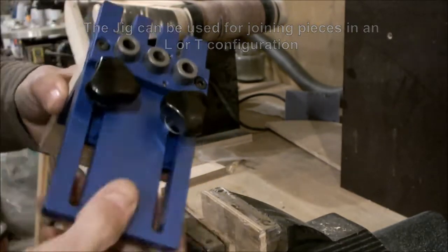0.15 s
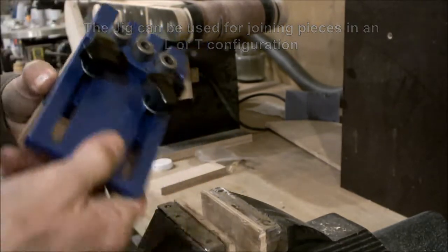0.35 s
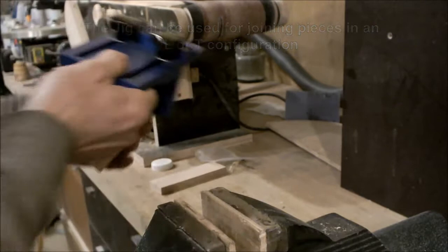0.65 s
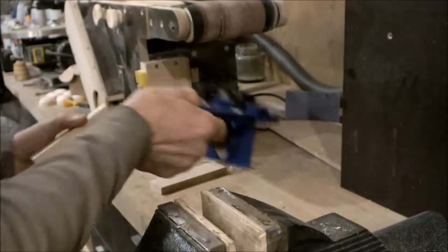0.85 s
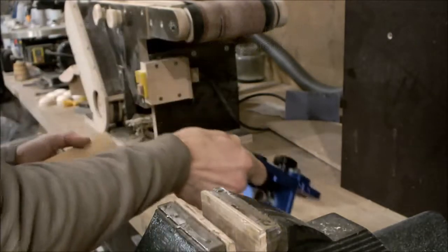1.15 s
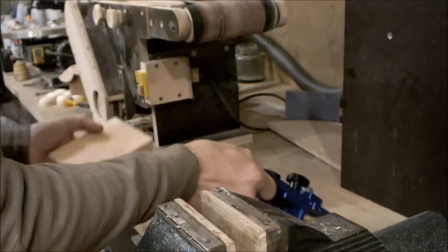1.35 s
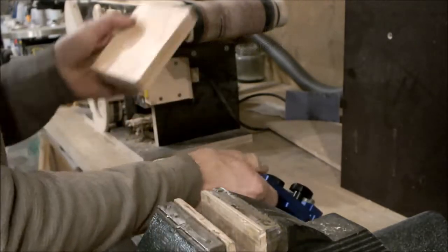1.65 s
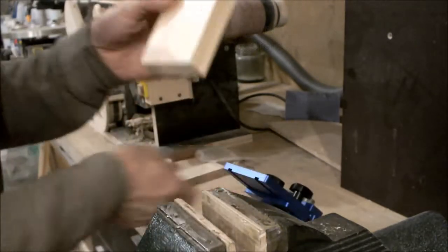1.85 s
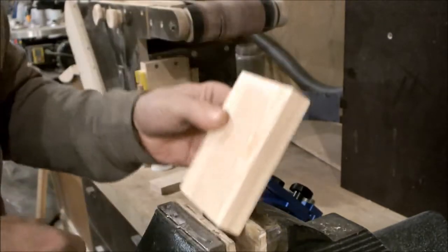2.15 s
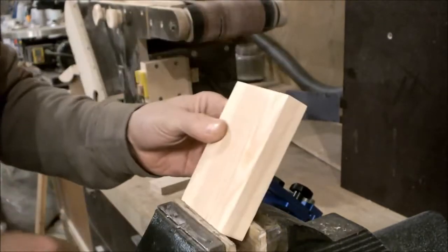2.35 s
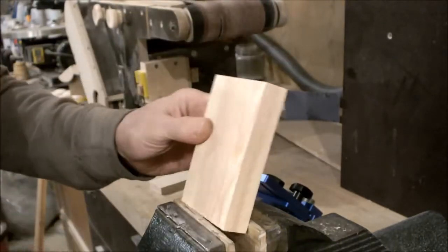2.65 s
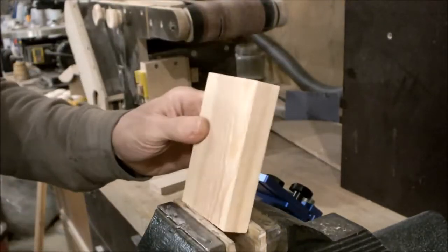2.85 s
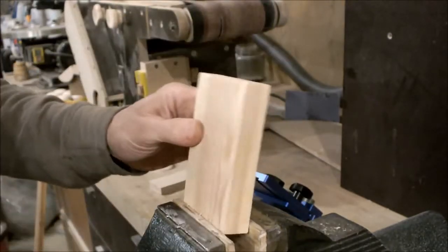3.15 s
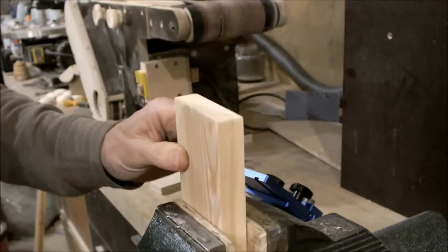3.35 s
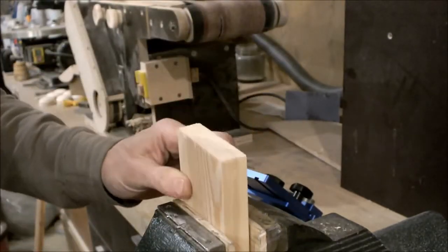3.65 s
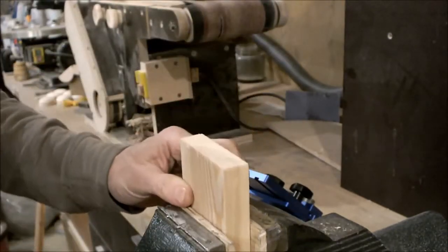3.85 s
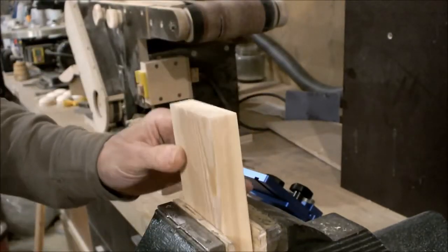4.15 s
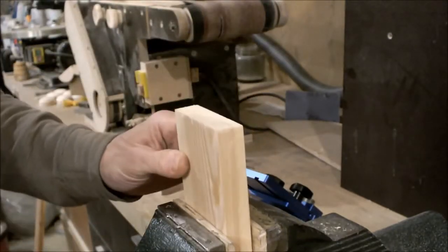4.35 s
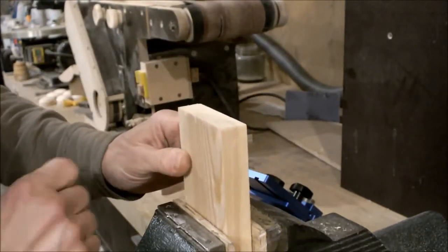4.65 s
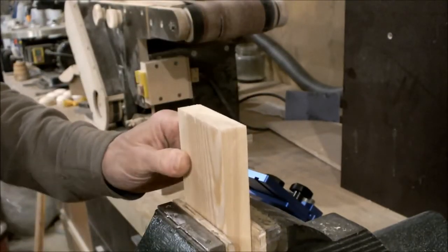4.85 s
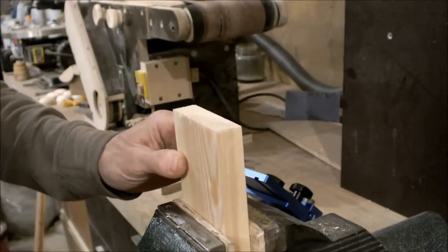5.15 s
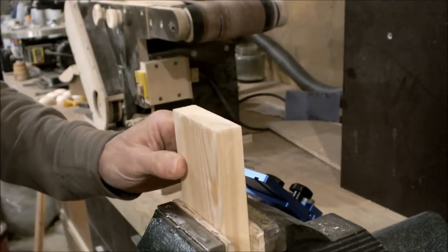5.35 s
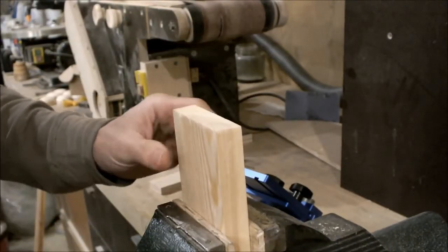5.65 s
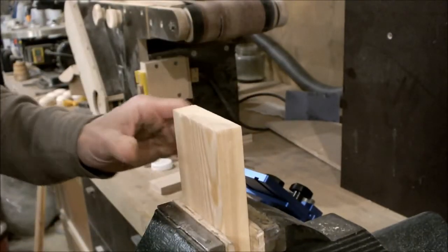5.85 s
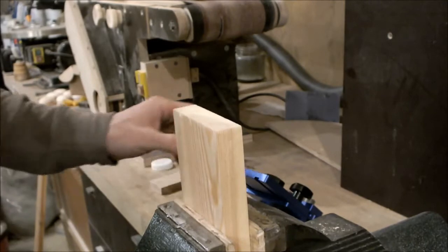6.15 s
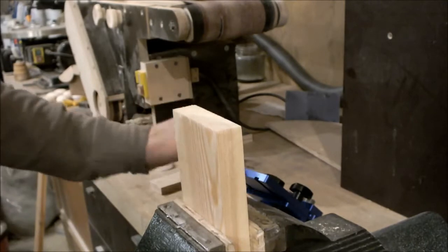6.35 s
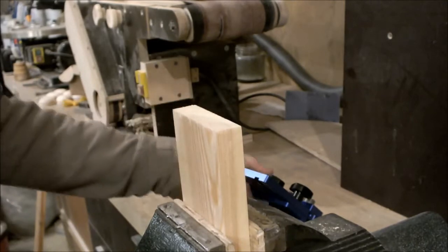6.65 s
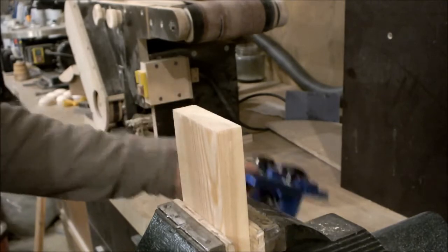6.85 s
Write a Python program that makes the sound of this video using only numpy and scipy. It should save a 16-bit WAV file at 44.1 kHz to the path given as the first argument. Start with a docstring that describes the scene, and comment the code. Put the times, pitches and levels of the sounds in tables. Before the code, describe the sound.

A metal jig clatters onto a wooden bench, a wood block knocks and scrapes into a vise, then the vise handle clacks and rings.

```python
"""Clamping pine in a vise

A metal jig rocks to rest on a wooden workbench. A pine block knocks against a vise and scrapes down
between the jaws, juddering and squeaking as it sticks and slips. The vise is tightened: its sliding
handle clacks on the screw head and rings. The work sits a little to the right. Sleeves rustle, and
a small workshop answers the blows over a faint steady hiss."""
import sys
import numpy as np
from scipy import signal
from scipy.fft import rfft, irfft, next_fast_len
from scipy.io import wavfile

SR = 44100
rng = np.random.default_rng(int(sys.argv[2]) if len(sys.argv) > 2 else 0)


def wrap_up_sound(samples):
    """Save the sound to the file named by the first command line argument, as 16-bit audio."""
    columns = np.atleast_2d(samples).T
    # keep every value between -1 and 1, then stretch to whole-number steps
    tamed = np.clip(columns, -1, 1)
    steps = np.round(tamed * 32767).astype(np.int16)
    wavfile.write(sys.argv[1], SR, steps)


N = 308700
T = np.arange(SR // 2) / SR  # time axis of one blow or stroke

# handle hits screw head; the faint last row is a hand brushing the handle: start_s, body_db, click_db, ping_hz,
# ping_re_click_db, struck_hz, struck_db
HANDLE_CLACKS = [(4.9647, -26.5, -20.5, 2600, 3, 4380, -30.5), (5.079, -39.5, -38, 1470, 2, 1554, -41),
                 (5.2793, -36.5, -35, 1780, -1, 1695, -46), (5.313, -25, -20, 2480, 6.5, 2360, -29),
                 (5.493, -38.5, -39.5, 1500, -6, 1166, -44), (6.103, -17.5, -17.5, 3150, -4, 1575, -38),
                 (6.3083, -23.5, -19.5, 1825, 0.5, 7170, -30.5), (6.317, -30, -21, 1650, 8, 1204, -26),
                 (6.358, -32.5, -31, 2240, 9, 2810, -38.5), (6.364, -32, -28, 1160, 19, 1700, -27.5),
                 (6.774, -37.5, -58, 1580, -9, 1576, -41)]
# jolts pass through the vise into the bench frame: start_s, level_db
FRAME_JOLTS = [(3.576, -48), (4.967, -46), (6.105, -36)]
# the jig lands on the bench: start_s, level_db, hardness_hz
JIG_KNOCKS = [(1.417, -41, 169), (1.447, -51.5, 170), (1.54, -29, 520), (1.5714, -15, 2060),
              (1.587, -21.5, 900), (1.622, -37, 1300), (1.661, -22, 706)]
# the block bumps the jaws: start_s, level_db, hardness_hz
PINE_KNOCKS = [(2.201, -34, 1110), (2.213, -30, 5920), (2.572, -43, 1600), (2.64, -54.5, 900),
               (3.0585, -32.5, 1990), (3.177, -42, 1320), (3.201, -39.5, 1100), (3.272, -38, 4500),
               (3.306, -29, 1370), (3.8445, -39.5, 3040), (4.166, -40, 1820), (4.349, -50, 550),
               (4.725, -49, 617)]
# the block is pushed down, scrapes louder and catches: catch_s, level_db, rise_s
PINE_PUSHES = [(2.635, -44, 0.042), (3.302, -32.5, 0.024), (3.563, -32.5, 0.035), (3.718, -37, 0.026)]
# it slides lightly along the jaws: peak_s, level_db, rise_s
PINE_SLIDES = [(2.5, -46.5, 0.12), (3.256, -34, 0.0096), (4.0, -39.5, 0.049)]
# a sharp edge ticks on the metal: peak_s, level_db
EDGE_TICKS = [(3.058, -32.5), (3.167, -38.5), (3.4663, -32.5), (6.86, -43.5)]
# stick-slip runs: start_s, level_db, length_s, hardness_hz
PINE_JUDDERS = [(2.219, -32, .02, 2770), (3.269, -30, 0.0052, 2220), (3.294, -29.5, 0.014, 3030),
                (3.548, -33, 0.033, 2600), (3.703, -34, 0.015, 2800), (4.001, -39.5, 0.052, 1690),
                (4.168, -41, 0.017, 1920), (4.205, -44.5, 0.042, 1300)]
# squeaks on a jaw: peak_s, level_db, pitch_hz, half_length_s
PINE_SQUEAKS = [(3.566, -32, 2500, 0.0041), (3.565, -32, 3290, 0.0033)]
# sleeves and hands brush past: peak_s, level_db, rise_s
SLEEVE_STROKES = [(.23, -53.5, 0.096), (.46, -53.5, 0.021), (1.3, -50, 0.035), (1.675, -51, 0.094),
                  (1.86, -52.5, 0.045), (2.06, -48, 0.036)]

# how each body rings: pitch_hz, level_db, t60_s
HANDLE_MODES = [(406.5, -4, 0.15), (1198, -6, 0.15), (1480, -3, 0.3), (1575, -4, 0.41), (1670, -1, 0.25),
                (1800, -7, 0.22), (2330, -10, 0.17), (2594, -5.5, 0.24), (2780, -4.5, 0.098),
                (3310, -8.5, 0.13), (3690, -3, 0.14)]
FRAME_MODES = [(112, -1, 0.18), (144, -0.5, 0.25), (192.7, -2, 0.33)]
BENCH_MODES = [(166, 0.5, 0.09), (295, -8, 0.58), (334, 4.5, 0.18), (395, 9, 0.12), (458.5, 0, 0.2),
               (524, -1, 0.23), (618, 2.5, 0.21), (652, -0.5, 0.23), (721, 6, 0.17), (844, 2, 0.12),
               (1120, 3, 0.093), (1717, -15, 0.48)]
PINE_MODES = [(347, -8, 0.6), (476, 7.5, 0.089), (838, 6, 0.23), (1008, 13.5, 0.065), (1403, 13, 0.061),
              (1526, 15, 0.043), (1829, 15.5, 0.041), (2624, 20, 0.026)]
JAW_MODES = [(1350, 1.5, 0.05), (1484, 8.5, 0.076), (1640, 7, 0.053), (2440, -0.5, 0.014)]

# tone colour of each layer: frequency_hz, gain_db
VISE_EQ = [(40, -20), (130, -6), (220, -7), (420, 4), (620, -5.5), (900, 4.5), (1600, -2), (2000, -1.5),
           (2800, -2.5), (5000, -7.5), (8000, -6), (15000, -7)]
CLICK_EQ = [(200, -26), (800, -8.5), (1800, 0), (4000, -5.5), (8500, -10), (15000, -13)]
BENCH_EQ = [(40, -56), (90, -20), (150, -9.5), (225, -12), (330, 0.5), (650, 0.5), (1000, -8.5),
            (1400, -14), (2500, -18), (6000, -38), (15000, -38)]
PINE_EQ = [(50, -22), (200, -5.5), (320, 9.5), (900, 4), (1500, 11.5), (2000, 6.5), (3000, 2.5),
           (5000, -4.5), (15000, 2)]
SCRAPE_EQ = [(110, -24.5), (350, -7), (800, -5), (1450, -5.5), (2000, 1.5), (3000, 8), (4500, 2),
             (8000, -4.5), (15000, -9)]
CLOTH_EQ = [(150, -5), (600, -13), (1500, 7.5), (3000, 4), (4800, 9), (8000, 2.5), (15000, 5)]
HISS_EQ = [(15, -60), (25, -13), (119, -6.5), (331, -1.5), (598, -4), (684, -1), (997, -7.5), (2300, -9),
           (4400, -13), (6920, -17.5), (15500, -28.5)]

# the workshop's decay: frequency_hz, t60_s
ROOM_DECAY = [(120, 0.5), (400, 0.36), (14000, 0.32)]
# stereo width of the action and of the hiss: frequency_hz, side_minus_mid_db
ACTION_WIDTH = [(100, -47), (350, -20), (700, -12), (1500, -2), (4000, -3), (10000, 0)]
HISS_WIDTH = [(60, -1.5), (300, -3), (700, -4), (1500, -1), (5000, 0)]
# where the work sits between left and right: frequency_hz, left_minus_right_db
BENCH_PAN = [(300, -3), (950, -2.5), (1700, -6), (3700, -5), (13000, 1.8)]

FIRM_DB, FIRM_HZ, HARDNESS_DB_PER_OCTAVE = -24, 3460, 12.8  # a firm clack; stronger is brighter
SHAKE_HZ, SHAKE_DB_PER_OCTAVE = 125, 41  # low cut of a firm clack; stronger reaches deeper
RATTLE_RATE_HZ, RATTLE_AT_HZ = 96, 4000  # speed of the rattle; pitch that wavers by one radian
ROCK_S, ROCK_SHRINK, ROCK_FIRST_DB, ROCK_NEXT_DB = .028, 0.65, -19.5, -0.5  # the jig's rebounds
ENTER_S, SEATED_S = 2.3, 3.88  # the block enters the jaws; it sits fully between them
GRIP_SHIFT = .025  # share by which hand and jaws retune the block from contact to contact
PUSH_STOP_S, PUSH_BRIGHT_HZ = 0.0072, 11400
TICK_RISE_S, TICK_FALL_S, TICK_BRIGHT_HZ = 0.0029, 0.0055, 14000
TOP_HZ = 15900


def vise_clacks(ping_t60=0.019, struck_t60=0.2, swell_s=0.0033, rise_cycles=2.13, steel_db=-4):
    """Steel hits steel: a bright click, a dead ping, a roomy body and the loose handle's ring."""
    out = np.zeros((2, N))
    for s, body_db, click_db, ping_hz, ping_db, struck_hz, struck_db in HANDLE_CLACKS:
        hard_hz = hardness(body_db)
        low_hz = SHAKE_HZ * 2 ** ((FIRM_DB - body_db) / SHAKE_DB_PER_OCTAVE)
        push = contact(t60=0.036, push_db=-31, rise_s=rise_cycles / hard_hz)
        ping = ring([(ping_hz, 0, ping_t60)]) * (1 - np.exp(-T * ping_hz))  # builds over one cycle
        snap = soften(colour(push, CLICK_EQ), 1.76 * hardness(click_db), order=3)
        click = blow(unit(snap) + undb(ping_db) * ping, click_db)
        shake = colour(through(push, workshop()), VISE_EQ)
        body = blow(radiate(soften(shake, hard_hz), low_hz), body_db)
        steel = blow(soften(ring(HANDLE_MODES, rattle=1.0), 3.4 * hard_hz), body_db + steel_db)
        struck = blow(ring([(struck_hz, 0, struck_t60)], rattle=1.0), struck_db)  # the mode hit hardest
        swell = 1 - np.exp(-T / swell_s)  # the ring spreads through the heavy casting
        add(out, s, click + body + (steel + struck) * swell)
    return out


def hardness(db):
    """A stronger blow flattens the contact faster, so its treble cutoff in Hz is higher."""
    return FIRM_HZ * 2 ** ((db - FIRM_DB) / HARDNESS_DB_PER_OCTAVE)


def frame_thumps(rise_s=0.018):
    """The heavy bench frame takes up a jolt slowly and hums briefly."""
    out = np.zeros((2, N))
    for s, db in FRAME_JOLTS:
        add(out, s, blow(ring(FRAME_MODES) * (1 - np.exp(-T / rise_s)), db))
    return out


def wood_knocks(rows, eq, modes, contact_t60, push_db, ring_db, room_db, low_hz, grip=0):
    """Blows on wood: a broad thud, damped modes and the room's answer."""
    out = np.zeros((2, N))
    for s, db, hard_hz in rows:
        thud = unit(colour(contact(contact_t60, push_db, rise_s=0.00044), eq))
        attack = 1 - np.exp(-T * hard_hz / 1.24)  # a soft knock swells more slowly
        wood = (thud + undb(ring_db) * ring(retuned(modes, grip))) * attack
        near = blow(radiate(soften(wood, hard_hz, order=3), low_hz), db)
        add(out, s, near + blow(through(near, workshop()), db + room_db))
    return out


def jig_rocking(rebounds=3):
    """The jig rocks on its edges after each knock, every rebound sooner and weaker."""
    for s, db, hard_hz in JIG_KNOCKS:
        yield s, db, hard_hz
        for k in range(rebounds):
            s += ROCK_S * ROCK_SHRINK ** k
            yield s, db + ROCK_FIRST_DB + k * ROCK_NEXT_DB, hard_hz


def scrapes(jaws_db=-0.5, hollow_db=-12, room_db=-7):
    """Rubbing rings the hollow-sounding block, and the jaws too as it sinks between them."""
    pushes = [(s, db, rise, PUSH_STOP_S, PUSH_BRIGHT_HZ) for s, db, rise in PINE_PUSHES]
    ticks = [(s, db, TICK_RISE_S, TICK_FALL_S, TICK_BRIGHT_HZ) for s, db in EDGE_TICKS]
    slides = swells(PINE_SLIDES, fall_share=0.58, bright_hz=11900)
    rub = rubbing(pushes + ticks + slides, SCRAPE_EQ, grain_db=3.0, rasp_db=2.0)
    jaws = through(rub * seated(np.arange(N) / SR), ring(JAW_MODES))
    hollow = through(rub, ring(PINE_MODES))
    wood = rub + undb(jaws_db) * jaws + undb(hollow_db) * hollow
    return wood + undb(room_db) * through(wood, workshop())


def rubbing(strokes, eq, grain_db, rasp_db=0, rasp_hz=140):
    """Fibres catch and slip in uneven grains that can bunch into a rasp; each stroke swells and fades."""
    out = np.zeros((2, N))
    from_peak = T - T.mean()
    for s, db, rise, fall, bright_hz in strokes:
        grains = np.repeat(undb(grain_db * rng.standard_normal(len(T))), 24)[:len(T)]  # 24 samples each
        grains = grains * undb(rasp_db * waver(rasp_hz))
        friction = colour(noise(len(T), ACTION_WIDTH) * grains, eq)
        rub = unit(soften(friction, bright_hz)) * np.sqrt(len(T))
        envelope = np.exp(np.minimum(from_peak / rise, -from_peak / fall))
        add(out, s - T.mean(), rub * undb(db) * envelope)
    return radiate(out, 79)


def swells(rows, fall_share, bright_hz):
    """Free rubbing strokes, each fading in proportion to its rise."""
    return [(s, db, rise, fall_share * rise, bright_hz) for s, db, rise in rows]


def seated(s):
    """How deep the block sits between the jaws, from 0 to 1."""
    return np.interp(s, (ENTER_S, SEATED_S), [0, 1])


def judders(slip_hz=760, uneven=0.355, spread_db=2, low_hz=200, ring_db=-2, jaws_db=-5.5, room_db=-5):
    """The block sticks and slips in a quick uneven run that swells, dies away and rings hollow."""
    out = np.zeros((2, N))
    for s, db, length, hard_hz in PINE_JUDDERS:
        gaps, sizes = rng.standard_normal((120, 2)).T  # 120 slips a run
        slip_s = np.cumsum(np.exp(uneven * gaps)) / slip_hz
        slips = np.bincount((slip_s * SR).astype(int), undb(spread_db * sizes), len(T))[:len(T)]
        envelope = np.sqrt(T) * np.exp(-(T / length) ** 2)
        tap = unit(colour(contact(t60=0.0069, push_db=-39, rise_s=0.00083), PINE_EQ))
        wood = tap + undb(ring_db) * ring(retuned(PINE_MODES, GRIP_SHIFT))
        run = unit(through((slips * envelope)[None], wood))
        jaws = undb(jaws_db) * seated(s) * unit(through(run, ring(JAW_MODES)))
        near = blow(radiate(soften(run + jaws, hard_hz, order=3), low_hz), db)
        add(out, s, near + blow(through(near, workshop()), db + room_db))
    return out


def squeaks(wobble=0.018, wobble_hz=250, room_db=-9):
    """Dry wood sings for an instant on the jaw, its pitch unsteady."""
    out = np.zeros((2, N))
    for s, db, hz, half_s in PINE_SQUEAKS:
        pitch_hz = hz * (1 + wobble * waver(wobble_hz))
        tone = np.sqrt(2) * np.sin(2 * np.pi * np.cumsum(pitch_hz) / SR)
        envelope = np.exp(-((T - T.mean()) / half_s) ** 2)
        add(out, s - T.mean(), tone[None] * undb(db) * envelope)
    return out + undb(room_db) * through(out, workshop())


def sleeves(stir_db=-68, stir_hz=4, swing_db=5):
    """Cloth brushes past in strokes and stirs faintly in between as the arms move."""
    cloth = colour(noise(N, ACTION_WIDTH), CLOTH_EQ)
    stir = cloth / cloth.std() * undb(stir_db + swing_db * np.tanh(waver(stir_hz, size=N)))
    strokes = swells(SLEEVE_STROKES, fall_share=0.83, bright_hz=11900)
    return stir + rubbing(strokes, CLOTH_EQ, grain_db=3.0)


def workshop(build_s=0.0016):
    """A fresh set of dense reflections off the cluttered bench and near walls; treble dies first."""
    spectrum = rfft(noise(len(T), ACTION_WIDTH))
    hz = np.arange(spectrum.shape[-1]) * SR / len(T)
    centres, t60s = np.transpose(ROOM_DECAY)
    tail = 0
    for share, t60 in zip(np.eye(len(centres)), t60s):
        band = irfft(spectrum * lookup(np.c_[centres, share], hz))
        tail = tail + band * fade(t60)
    return unit(tail * (1 - np.exp(-(T / build_s) ** 2)))


def hiss(level_db=-53.5, left_db=-1.0):
    """Room tone: the quiet air of the workshop."""
    air = colour(noise(N, HISS_WIDTH), HISS_EQ)
    return pan(air / air.std() * undb(level_db), left_db)


def contact(t60, push_db, rise_s):
    """A push, then the two surfaces bed in and chatter briefly."""
    attack = 1 - np.exp(-(T / rise_s) ** 2)
    force = unit(noise(len(T), ACTION_WIDTH) * fade(t60) * attack)
    force[:, 0] += undb(push_db)
    return force


def ring(modes, skew_rad=0.7, rattle=0):
    """Decaying modes; a loose part makes them waver, and high ones reach the sides out of step."""
    out = 0
    for (hz, db, t60), (size, side) in zip(modes, rng.standard_normal((len(modes), 2))):
        phase = np.array([[1], [-1]]) * np.sign(side) * skew_rad * min(hz / 2000, 1)
        if rattle:
            phase = phase + rattle * hz / RATTLE_AT_HZ * waver(RATTLE_RATE_HZ)
        out = out + undb(db + 2 * size) * fade(t60) * np.sin(2 * np.pi * hz * T + phase)
    return unit(out)


def retuned(modes, share):
    """The same modes, detuned by a new grip."""
    shifts = np.exp(share * rng.standard_normal(len(modes)))
    return [(hz * shift, db, t60) for (hz, db, t60), shift in zip(modes, shifts)]


def soften(x, hz, order=2):
    """Low-pass: a softer contact pushes longer and loses the treble."""
    return signal.sosfilt(signal.butter(order, min(hz, SR * 4 / 9), fs=SR, output="sos"), x)


def radiate(x, hz):
    """High-pass: small things move little air in the deep bass."""
    return signal.sosfilt(signal.butter(3, hz, "high", fs=SR, output="sos"), x)


def colour(x, eq):
    """Minimum-phase EQ, so nothing rings ahead of an attack."""
    size = next_fast_len(x.shape[-1] + 4096) * 2
    hz = np.arange(size // 2 + 1) * SR / size
    cepstrum = irfft(np.log(undb(lookup(eq, hz))))
    cepstrum[1:size // 2] *= 2
    cepstrum[size // 2 + 1:] = 0
    return irfft(rfft(x, size) * np.exp(rfft(cepstrum)))[..., :x.shape[-1]]


def through(x, response):
    """Pass a sound through a body or a room."""
    return signal.fftconvolve(x, response, axes=-1)[:, :x.shape[-1]]


def noise(size, width):
    """White noise whose stereo width follows a curve over frequency."""
    mid, side = rfft(rng.standard_normal((2, size)))
    share = undb(lookup(width, np.arange(len(mid)) * SR / size))
    return irfft(np.array([mid + share * side, mid - share * side]) / np.sqrt(1 + share ** 2), size)


def waver(hz, size=len(T)):
    """Smooth random modulation with a spread of one."""
    drift = soften(rng.standard_normal(size), hz)
    return drift / drift.std()


def fade(t60):
    """Free decay, 60 dB down after t60 seconds."""
    return np.exp(-np.log(1000) * T / t60)


def blow(x, db):
    """Set a blow's level as if all its energy fell in a hundredth of a second."""
    return unit(x) * undb(db) * np.sqrt(SR / 100)


def unit(x):
    """Scale to an average energy of one per channel."""
    return x / np.sqrt(np.sum(x ** 2) / len(x))


def undb(db):
    """Decibels to gain."""
    return 10 ** (np.asarray(db) / 20)


def lookup(points, hz):
    """Read a curve on a log-frequency axis."""
    point_hz, value = np.transpose(points)
    return np.interp(np.log(np.maximum(hz, 1)), np.log(point_hz), value)


def add(out, s, x):
    """Mix a sound in at s seconds."""
    at = int(s * SR) + np.arange(x.shape[-1])
    inside = (at >= 0) & (at < N)
    out[:, at[inside]] += x[:, inside]


def pan(x, left_db):
    """Lean a sound to one side."""
    return x * undb(np.array([[1], [-1]]) * left_db / 2)


def place_at_bench(x):
    """Set the work a little to the right, most of all in the upper mids."""
    hz = np.arange(N // 2 + 1) * SR / N
    return irfft(pan(rfft(x), lookup(BENCH_PAN, hz)), N)


def scene():
    """Jig, block, vise and sleeves at one bench, over the room tone."""
    jig = wood_knocks(jig_rocking(), BENCH_EQ, BENCH_MODES, contact_t60=0.043,
                      push_db=-1.0, ring_db=-6.0, room_db=-4.5, low_hz=132)
    block = wood_knocks(PINE_KNOCKS, PINE_EQ, PINE_MODES, contact_t60=0.072,
                        push_db=-10, ring_db=-8.5, room_db=-5.5, low_hz=93, grip=GRIP_SHIFT)
    vise = vise_clacks() + frame_thumps()
    friction = scrapes() + judders() + squeaks()
    return place_at_bench(jig + block + vise + friction + sleeves()) + hiss()


def record(dry):
    """A steep low-pass trims the very top of the mix."""
    return signal.sosfilt(signal.ellip(10, .2, 70, TOP_HZ, fs=SR, output="sos"), dry)


dry = scene()
out = record(dry)
wrap_up_sound(out)
```